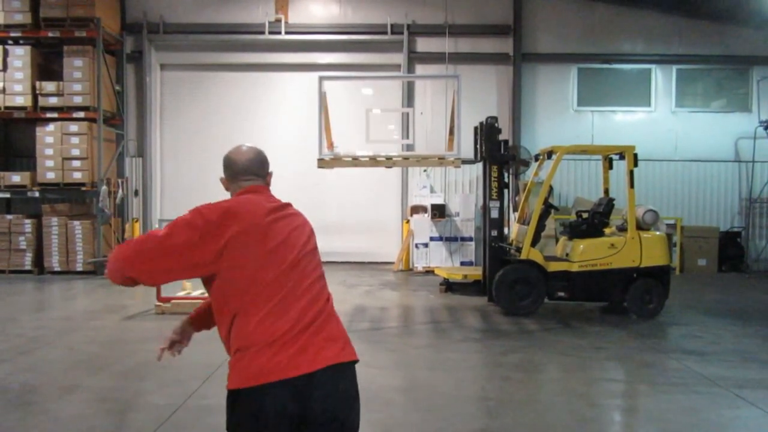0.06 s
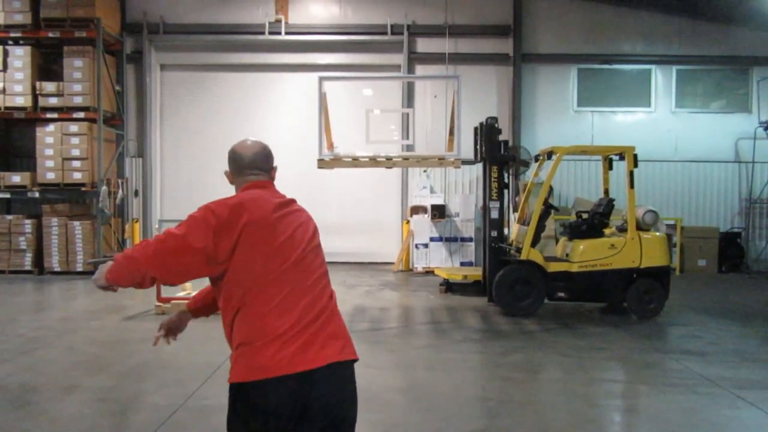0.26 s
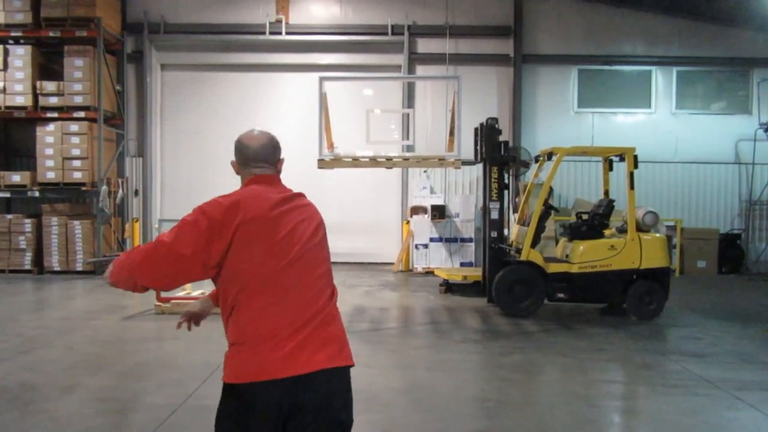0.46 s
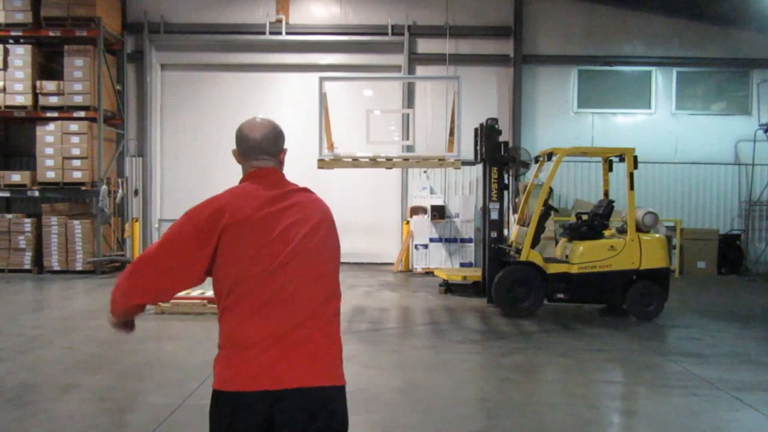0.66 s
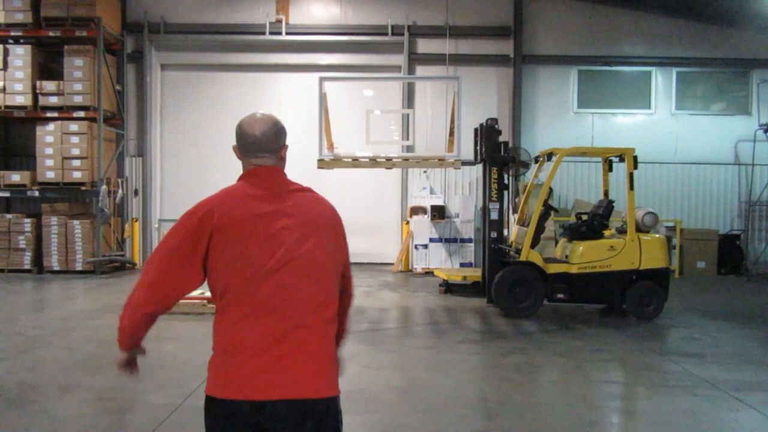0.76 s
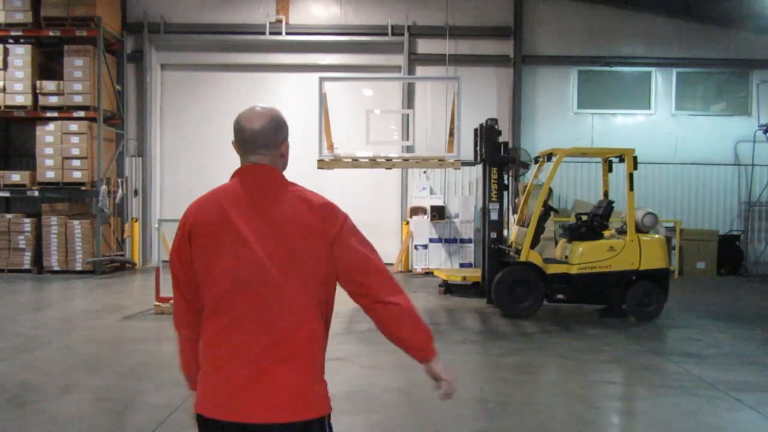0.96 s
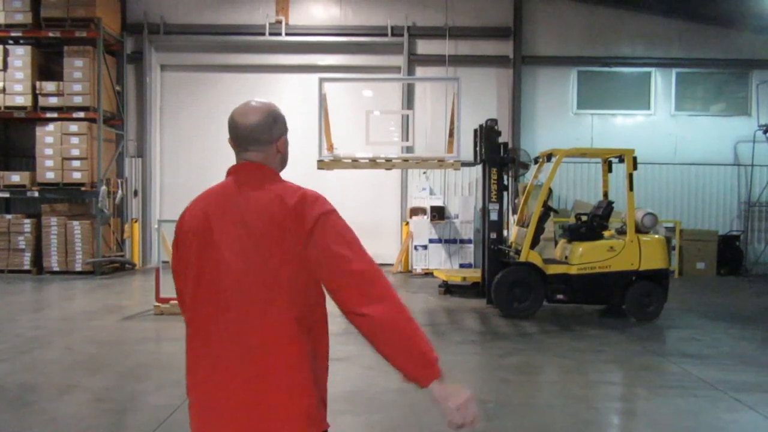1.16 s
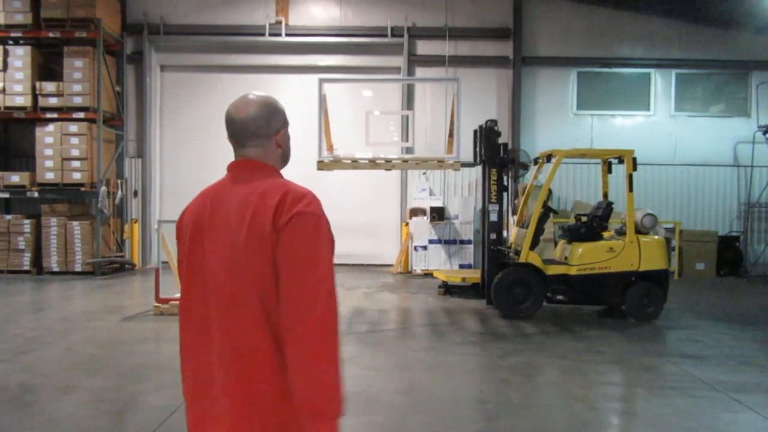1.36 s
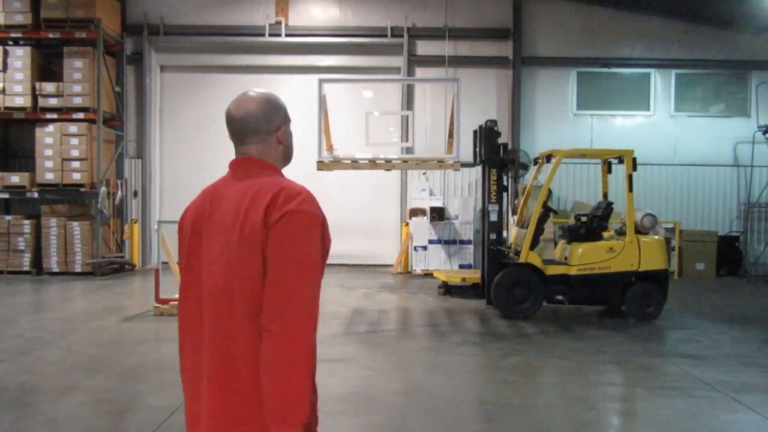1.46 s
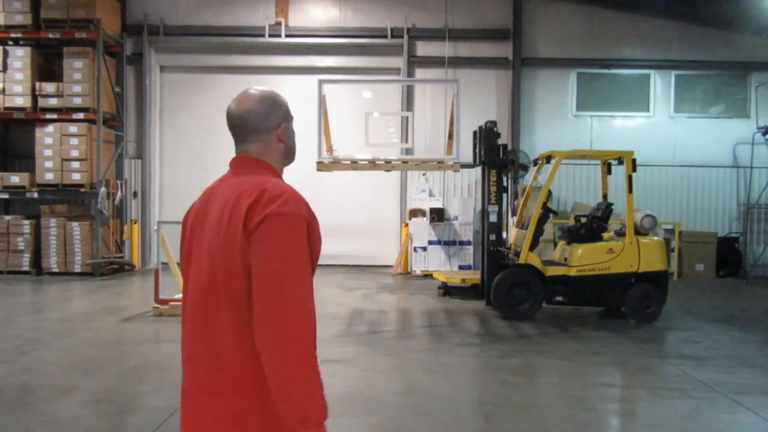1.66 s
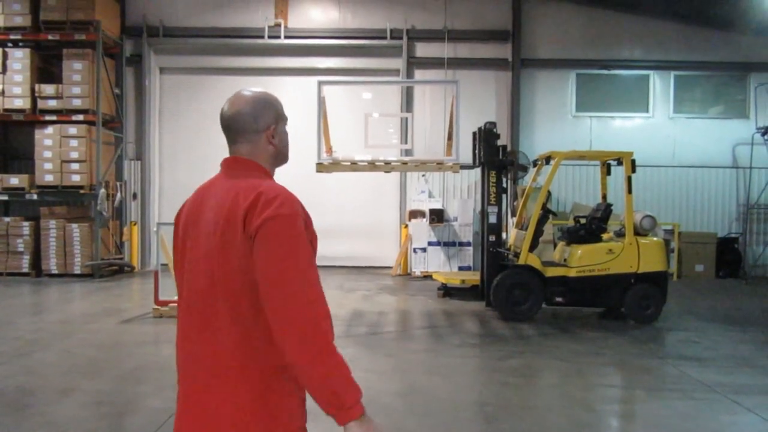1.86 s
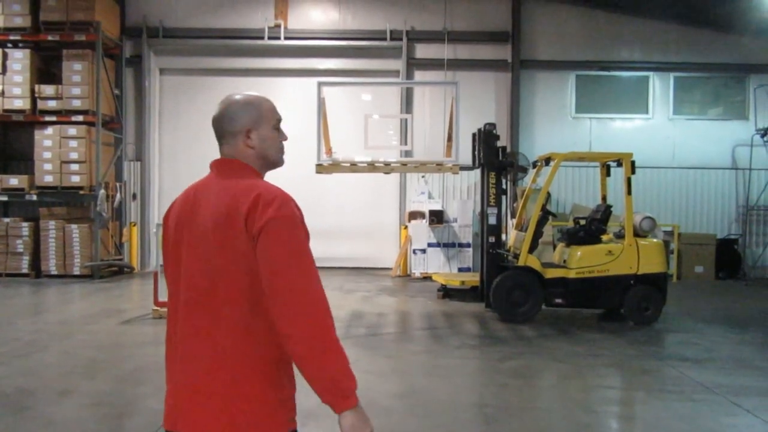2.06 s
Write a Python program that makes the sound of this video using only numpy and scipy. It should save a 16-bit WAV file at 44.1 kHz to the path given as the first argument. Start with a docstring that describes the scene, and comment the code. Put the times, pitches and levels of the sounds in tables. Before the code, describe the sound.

A thrown rock cracks sharply against a plastic backboard, echoing through a large warehouse, then clicks on concrete

```python
"""A large warehouse: ventilation and a thin whine, picked up by one microphone with a low rumble on it.
A thrown rock cracks against an acrylic backboard (struck modes and gritty noise), with smeared echoes
and a long bright reverberation of decaying noise; the crack overloads the recorder, whose gain ducks
at once and creeps back. Dull bumps follow, and the rock drops and skips on the concrete: three short
knocks, each with a clean echo, wall echoes and reverberation."""
import sys
import numpy as np
from scipy import signal
from scipy.fft import rfft, irfft
from scipy.io import wavfile

SR = 44100
rng = np.random.default_rng(int(sys.argv[2]) if len(sys.argv) > 2 else 0)


def generate_wav(signal):
    """Clip the signal to [-1, 1] and save it as 16-bit WAV at the path in sys.argv[1]."""
    frames = np.transpose(np.atleast_2d(signal))
    scaled = np.clip(frames, -1, 1) * 32767
    pcm = np.round(scaled).astype(np.int16)
    wavfile.write(sys.argv[1], SR, pcm)


N = 92610
T = np.arange(N) / SR                  # time [s]
FREQ = np.arange(N // 2 + 1) * SR / N  # spectrum axis [Hz]

# Spectra give colour only: noise() sets their overall level.
# Ventilation colour: f/Hz, relative level/dB per Hz
AIR_COLOUR = [(25, -7.5), (60, -6), (160, -1.5), (280, -11.5), (430, -5.5), (650, -8.5), (1100, -8),
              (2000, -13.5), (3300, -16), (6000, -23), (9000, -28), (14500, -39.5)]
# Machine tones: f/Hz, level/dB, half-width/Hz
MACHINE_TONES = [(163.5, -58, 16), (283, -55.5, 23), (592, -55, 24), (1037, -54.5, 9.8), (6290, -58, 160)]
# Rumble on the microphone: t/s, level/dB
RUMBLE_LEVEL = [(0, -44), (.06, -57), (.45, -66), (.95, -58), (1.3, -56), (2.1, -54.5)]
# Soft dull bumps: t/s, level/dB, centre f/Hz, half-width/Hz, length/s
DULL_BUMPS = [(0.434, -31.5, 460, 350, 0.0096), (0.471, -40, 250, 116.5, 0.071),
              (1.148, -37.5, 520, 305, 0.012), (1.819, -26.5, 916, 382, 0.00087)]
# Decay of the warehouse: f/Hz, t60/s
WAREHOUSE_T60 = [(100, 0.4), (500, 1.07), (1400, 1.207), (2700, 1.244), (4000, 1.09), (5500, 1),
                 (8000, 0.61), (11000, 0.7), (15000, 0.44)]
# Walls, nearest first: delay/s, smear/s
WALL_DELAYS = [(0.0183, .002), (0.0263, 0.0016), (.0545, .01)]
# Colour of the wall echoes: f/Hz, relative level/dB
WALL_ECHO_COLOUR = [(200, 8), (900, 2), (2200, 5.5), (5200, -3), (8000, -7), (14000, -26)]
# Rock on the floor: t/s, knock level/dB, knock f/Hz, ring level/dB, ring f/Hz, contact cut-off f/Hz,
# relative hall level/dB, first echo delay/s, its level re the click/dB, second wall echo level/dB
FLOOR_HITS = [(1.1633, 4.5, 2400, 8.5, 7580, 12100, -3.5, .005, -16, -9),
              (1.8054, 0, 3150, 5, 4630, 10000, 0.5, .0073, -27, -1),
              (2.0424, -3, 3400, -21.5, 5200, 8000, -6, .0082, -1, -8)]
# Reverberation colour of the bounces: f/Hz, relative level/dB per Hz
BOUNCE_HALL_COLOUR = [(200, 8.5), (800, -4.5), (2000, -2.5), (3500, -2.5), (5500, -8.5), (8000, -4),
                      (11000, -12.5), (15000, -5)]
# Struck board and rock: f/Hz, level re HIT_DB/dB, t60/s
BOARD_MODES = [(55, -41.5, .035), (104, -40.5, 0.61), (162, -30, .04), (310, -24.5, 0.14), (761, -18, .025),
               (1046, -5, 0.03), (1657, 1, 0.015), (2320, -1.5, 0.031), (2980, -6, .022),
               (3680, -5.5, 0.017), (4400, -6.5, 0.02), (6070, -4.5, 0.0081), (8580, -15, 0.011),
               (13000, -24.5, .005)]
# Gritty crush of stone against plastic: f/Hz, relative level/dB per Hz
GRIT_COLOUR = [(100, -14.5), (1000, -4.5), (2200, -2), (5500, -7), (10000, -24.5), (14500, -23.5)]
# Echoes of the crack: delay/s, level/dB, centre f/Hz, smear/s
BOARD_ECHOES = [(0.0116, 16.5, 4400, .0012), (0.014, 7.5, 4100, .0008), (0.0196, 11, 3330, .0008),
                (0.024, 17, 3100, .0012), (0.215, -10.5, 2900, 0.008)]
# Reverberation colour of the crack: f/Hz, relative level/dB per Hz
CRACK_HALL_COLOUR = [(50, -56), (110, -19), (250, -21.5), (500, -18.5), (1000, -14.5), (1700, -7),
                     (2800, 1.5), (4000, -4), (5500, -12.5), (8000, -17.5), (10500, -34.5), (15000, -41)]

AIR_DB = -45
RUMBLE_HZ, RUMBLE_HALF_WIDTH_HZ = 41.2, 22
FLUTTER_DB, FLUTTER_S = 0.36, 0.0021
HALL_BUILD_S = 0.0065
EARLY_DB, EARLY_DECAY_S = -0.5, 0.09  # extra energy from nearby shelves
NEAR_WALL_DB, FAR_WALL_DB = -3, -4.5  # relative to the hall setting
KNOCK_T60_S, RING_T60_S = 0.00053, 0.00081
BOUNCE_HALL_DELAY_S, CRACK_HALL_DELAY_S = 0.0032, 0.0073
HIT_S, HIT_DB = 0.2121, 15
GRIT_DB, GRIT_DECAY_S = 11.5, 0.0063
AGC_THRESHOLD_DB, AGC_RELEASE_DB_PER_S = -7.5, 6
AGC_WINDOW_S, AGC_ATTACK_S = 0.0035, 0.00068
CLIP_LEVEL, CUTOFF_HZ = 0.88, 14900


def from_db(db):
    """Decibels to gain."""
    return 10 ** (np.asarray(db) / 20)


def rms_one(x):
    """Scale to rms 1."""
    return x / np.sqrt(np.mean(x ** 2) + 1e-20)


def at_hz(points, hz):
    """Read a table on a log-frequency axis."""
    f, v = np.transpose(points)
    return np.interp(np.log(hz + 1e-9), np.log(f), v)


def noise(colour):
    """Steady noise of a given colour, rms 1."""
    white = rfft(rng.standard_normal(N))
    return rms_one(irfft(white * from_db(at_hz(colour, FREQ)), N))


def delay(x, s):
    """The same sound, s seconds later."""
    return np.concatenate([np.zeros(max(int(s * SR), 0)), x])[:N]


def convolve(x, response):
    """Play a sound through a response."""
    return signal.fftconvolve(x, response)[:N]


def smooth(x, s):
    """One-pole smoothing with time constant s."""
    r = np.exp(-1 / (s * SR))
    return signal.lfilter([1 - r], [1, -r], x)


def mode(hz, t60):
    """A struck resonance of height about 1, radiating no steady pressure."""
    r = from_db(-60 / (t60 * SR))
    w = 2 * np.pi * hz / SR
    impulse = (T == 0) + 1e-18  # the tiny offset avoids denormal numbers
    return signal.lfilter([.5, 0, -.5], [1, -2 * r * np.cos(w), r * r], impulse)


def narrow_noise(hz, half_width_hz):
    """Noise in one resonance, with its level swings compressed; rms 1."""
    resonance = 1 / (1 + ((FREQ - hz) / half_width_hz) ** 2)
    band = signal.hilbert(irfft(rfft(rng.standard_normal(N)) * resonance, N))
    return rms_one(band.real / (np.abs(band) + band.std()))


def burst(s, db, hz, half_width_hz, length):
    """A short swell of resonant noise that starts at s and peaks after half its length."""
    low_pass = 1 / (1 + (FREQ / (hz + 4 * half_width_hz)) ** 4)
    band = rms_one(irfft(rfft(narrow_noise(hz, half_width_hz)) * low_pass, N))
    swell = 2 * T / length * np.exp(1 - 2 * T / length)
    return delay(from_db(db) * band * swell, s)


def ventilation():
    """Steady rush of air as coloured noise, with faint machine tones as narrow noise."""
    air = from_db(AIR_DB) * noise(AIR_COLOUR)
    return air + sum(from_db(db) * narrow_noise(hz, width) for hz, db, width in MACHINE_TONES)


def low_noises():
    """Narrow low noise rumbles on the microphone; resonant swells make a few dull bumps."""
    level = from_db(np.interp(T, *np.transpose(RUMBLE_LEVEL)))
    rumble = level * narrow_noise(RUMBLE_HZ, RUMBLE_HALF_WIDTH_HZ)
    return rumble + sum(burst(*bump) for bump in DULL_BUMPS)


def flutter():
    """Uneven gain of reflections that arrive in clumps."""
    slow = smooth(smooth(rng.standard_normal(N), FLUTTER_S), FLUTTER_S)
    return from_db(FLUTTER_DB * rms_one(slow))


def hall(colour):
    """Diffuse reverberation: builds quickly, then overlapping third octaves die at their own rates."""
    field = rfft(noise(colour))
    third_octave = 3 * np.log2(np.clip(FREQ, 256, 16384))  # the end bands take what lies beyond
    tail = 0
    for k in np.unique(np.round(third_octave)):
        share = np.maximum(1 - np.abs(third_octave - k), 0)
        decay = from_db(-60 * T / at_hz(WAREHOUSE_T60, 2 ** (k / 3)))
        tail = tail + irfft(field * share, N) * decay
    build = 1 - np.exp(-T / HALL_BUILD_S)
    early = 1 + from_db(EARLY_DB) * np.exp(-T / EARLY_DECAY_S)
    return tail * flutter() * build * early


def wall_echoes(levels_db):
    """Short scattered reflections, one decaying burst of noise from each wall."""
    out = 0
    for (s, smear), db in zip(WALL_DELAYS, levels_db):
        scatter = noise(WALL_ECHO_COLOUR) * np.exp(-T / smear)
        out = out + from_db(db) * delay(scatter / np.linalg.norm(scatter), s)
    return out


def bounces():
    """Stone on concrete: a very short knock and ring, one clean echo, then walls and hall."""
    out = 0
    for (s, knock_db, knock_hz, ring_db, ring_hz, contact_hz,
         hall_db, echo_s, echo_db, wall_db) in FLOOR_HITS:
        knock = from_db(knock_db) * mode(knock_hz, KNOCK_T60_S)
        ring = from_db(ring_db) * mode(ring_hz, RING_T60_S)
        contact = signal.butter(2, contact_hz, fs=SR, output="sos")
        click = signal.sosfilt(contact, knock - ring)
        first_echo = from_db(echo_db) * delay(click, echo_s)

        tail = delay(hall(BOUNCE_HALL_COLOUR), BOUNCE_HALL_DELAY_S)
        tail = 2 * from_db(hall_db) * tail / np.linalg.norm(tail)
        walls = wall_echoes([hall_db + NEAR_WALL_DB, wall_db, hall_db + FAR_WALL_DB])
        out = out + delay(click + first_echo + convolve(click, tail + walls), s)
    return out


def backboard():
    """One hard gritty blow rings the modes of the board; smeared echoes and the hall follow."""
    crack = 0
    for k, (hz, db, t60) in enumerate(BOARD_MODES):
        sign = (-1) ** k  # neighbouring modes start in opposite directions
        crack = crack + sign * from_db(HIT_DB + db) * mode(hz, t60)
    grit = from_db(GRIT_DB) * noise(GRIT_COLOUR) * np.exp(-T / GRIT_DECAY_S)
    echoes = sum(burst(s, db, hz, half_width_hz=520, length=smear) for s, db, hz, smear in BOARD_ECHOES)
    tail = delay(hall(CRACK_HALL_COLOUR), CRACK_HALL_DELAY_S)
    return delay(crack + grit + echoes + tail, HIT_S)


def scene():
    """All sources at one microphone."""
    return (ventilation() + low_noises() + bounces() + backboard())[None]


def record(dry):
    """Gain control with a fast attack and slow release, overload, and a steep top cut."""
    level_db = 10 * np.log10(smooth(dry ** 2, AGC_WINDOW_S) + 1e-12)
    over_db = np.maximum(level_db - AGC_THRESHOLD_DB, 0)
    # each peak of the reduction is held, then let go at a constant rate
    release_db = AGC_RELEASE_DB_PER_S * T
    held_db = np.maximum.accumulate(over_db + release_db, axis=-1) - release_db
    ducked = dry * from_db(-smooth(held_db, AGC_ATTACK_S))
    clipped = np.clip(ducked, -CLIP_LEVEL, CLIP_LEVEL)
    top_cut = signal.ellip(10, .1, 90, CUTOFF_HZ, fs=SR, output="sos")
    return signal.sosfilt(top_cut, clipped)


dry = scene()
out = record(dry)
generate_wav(out)
```